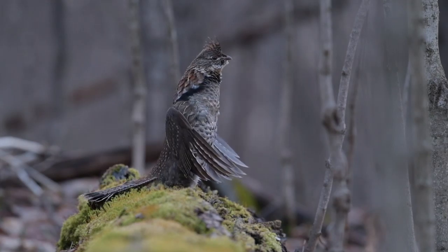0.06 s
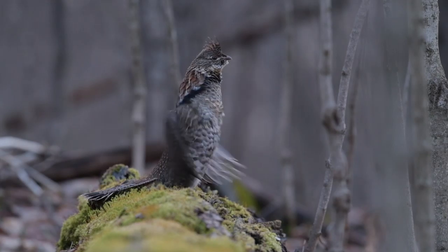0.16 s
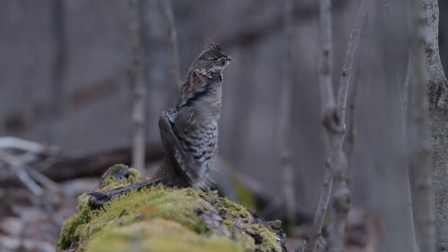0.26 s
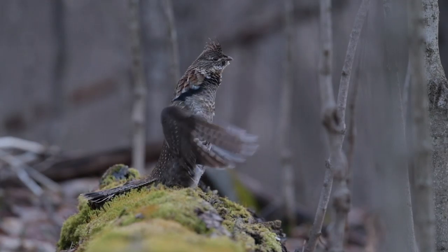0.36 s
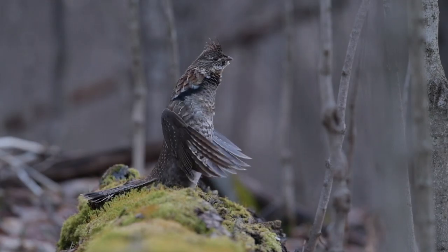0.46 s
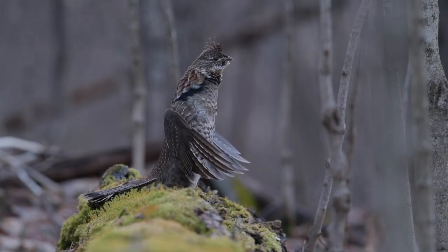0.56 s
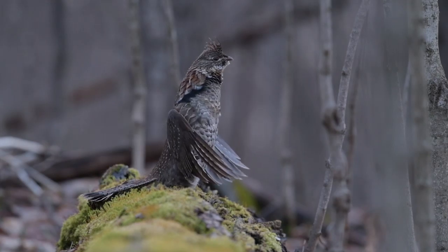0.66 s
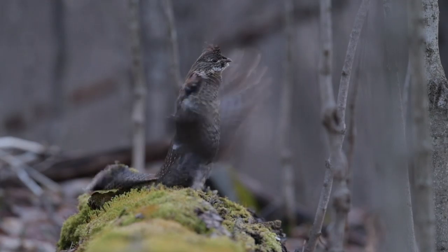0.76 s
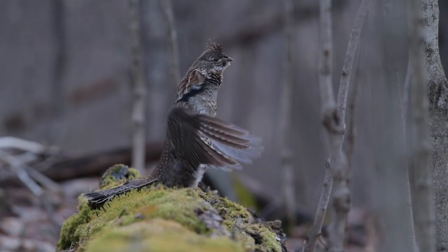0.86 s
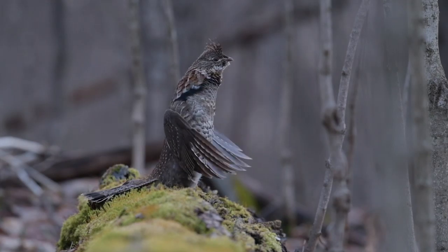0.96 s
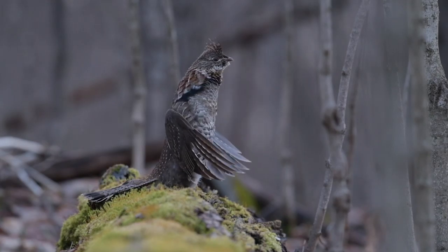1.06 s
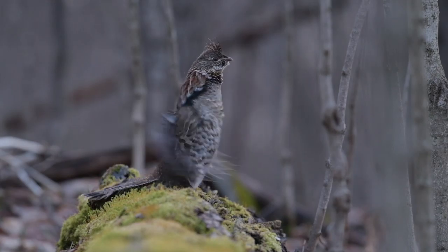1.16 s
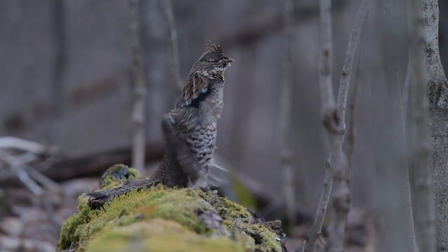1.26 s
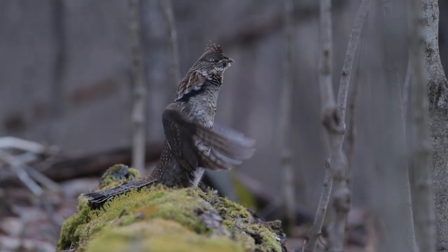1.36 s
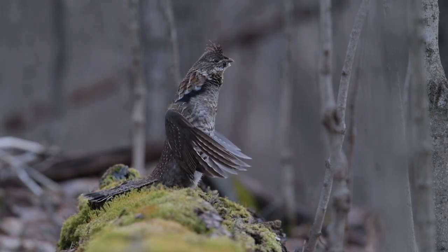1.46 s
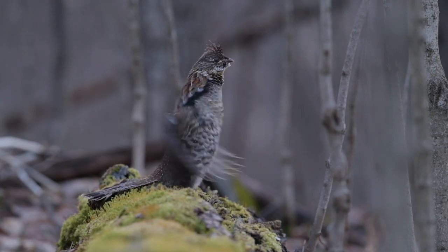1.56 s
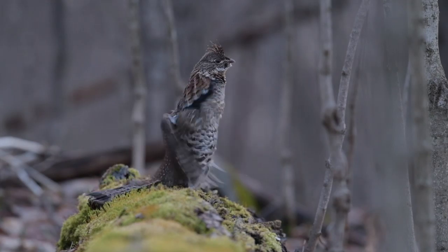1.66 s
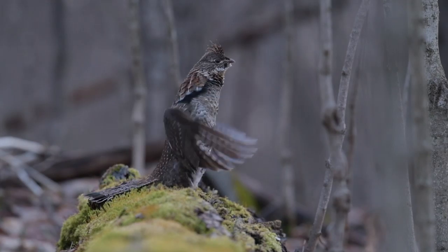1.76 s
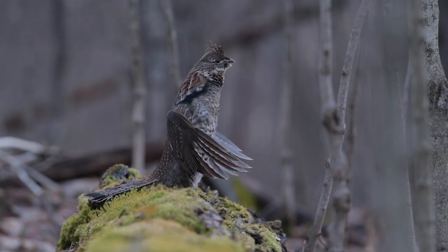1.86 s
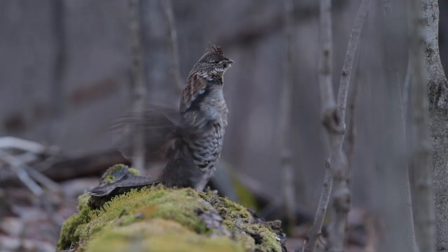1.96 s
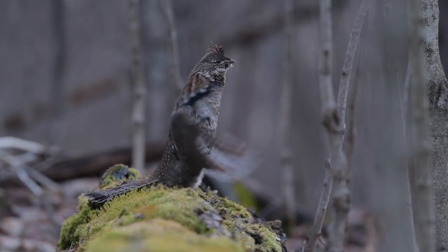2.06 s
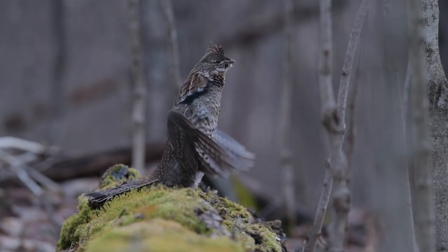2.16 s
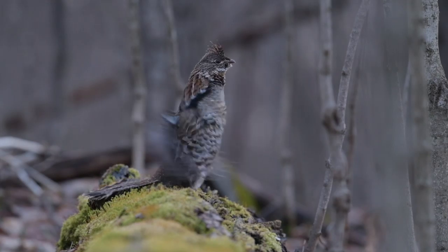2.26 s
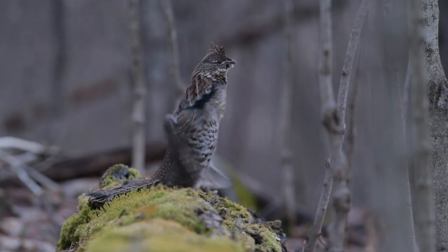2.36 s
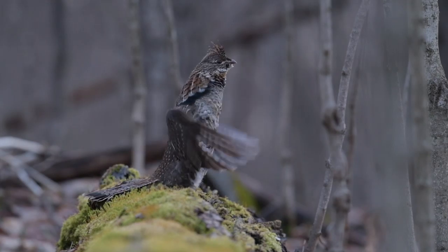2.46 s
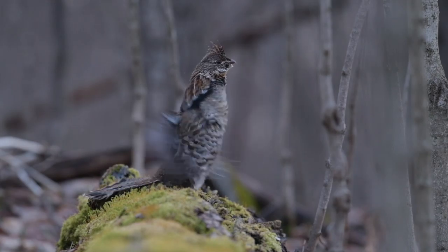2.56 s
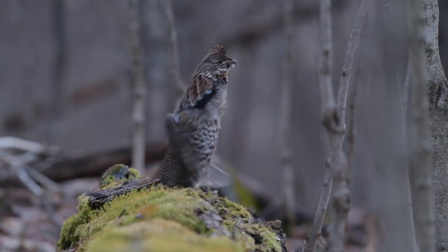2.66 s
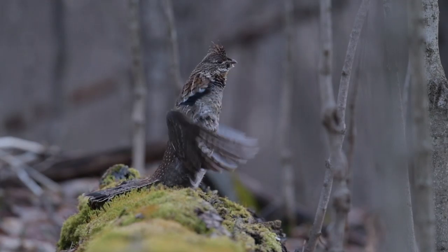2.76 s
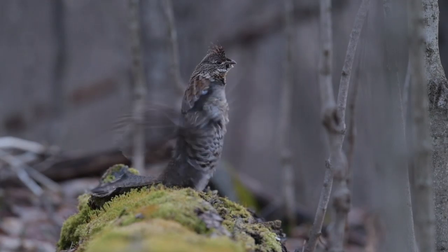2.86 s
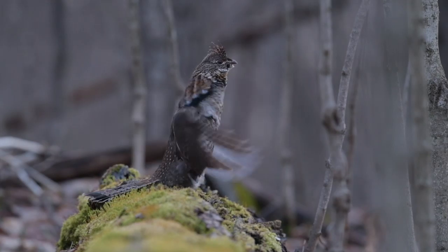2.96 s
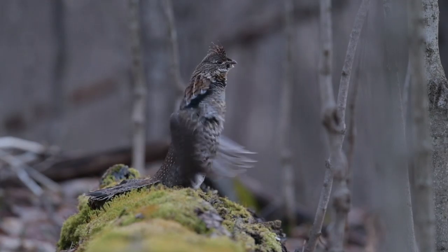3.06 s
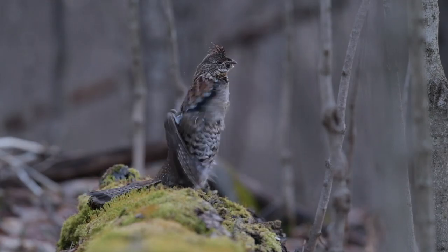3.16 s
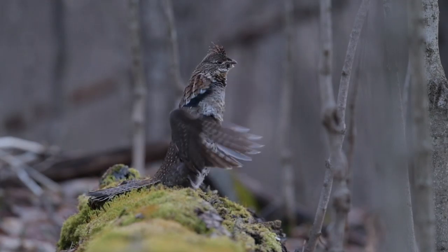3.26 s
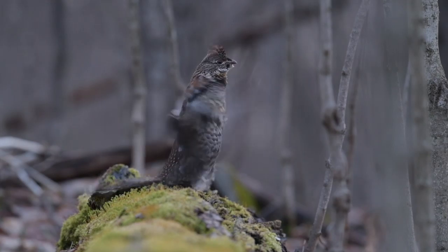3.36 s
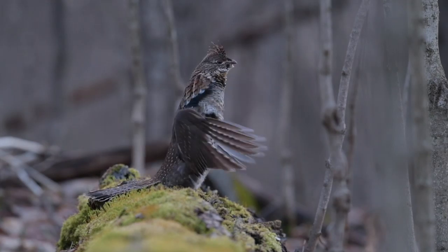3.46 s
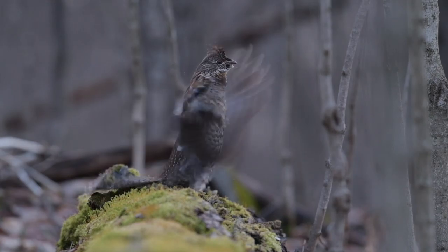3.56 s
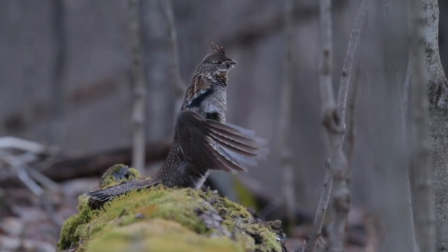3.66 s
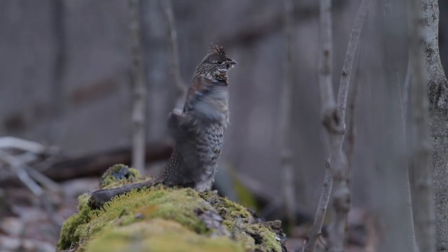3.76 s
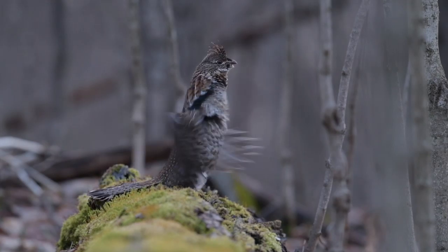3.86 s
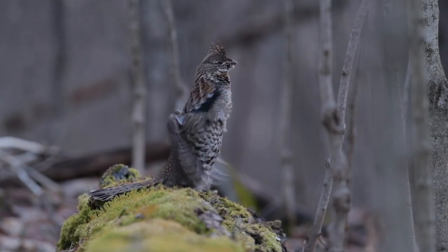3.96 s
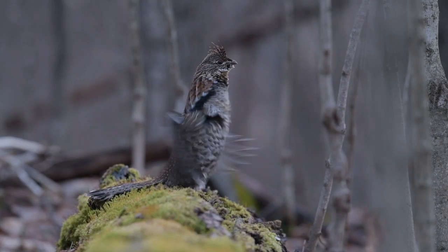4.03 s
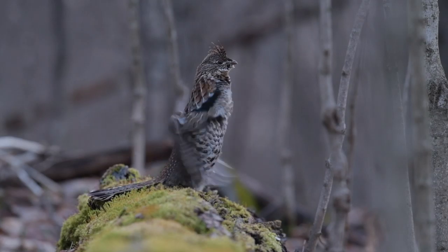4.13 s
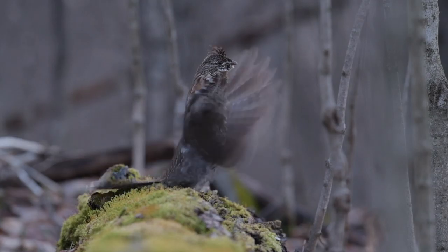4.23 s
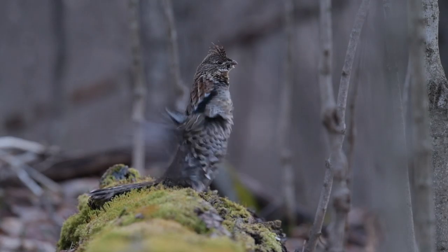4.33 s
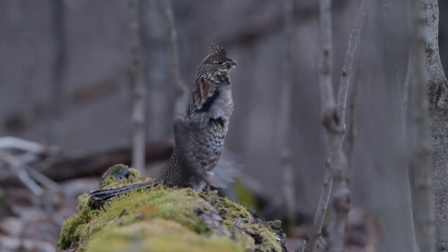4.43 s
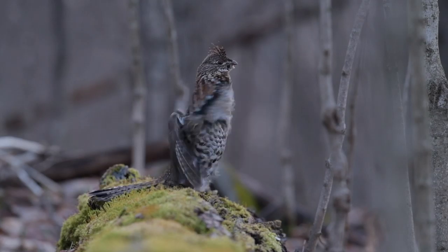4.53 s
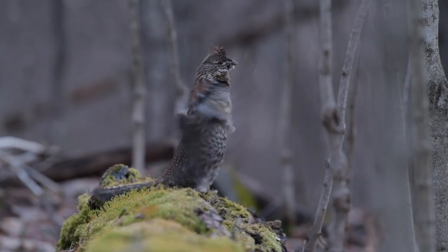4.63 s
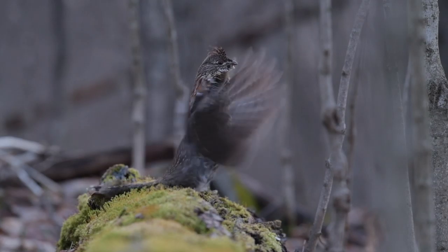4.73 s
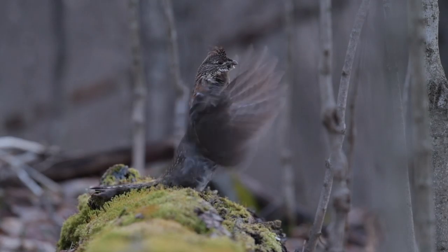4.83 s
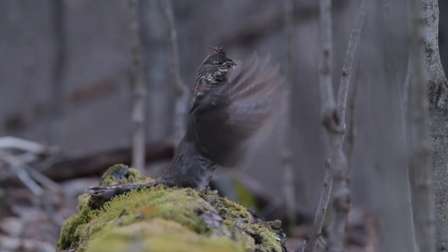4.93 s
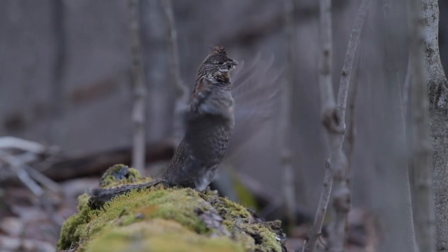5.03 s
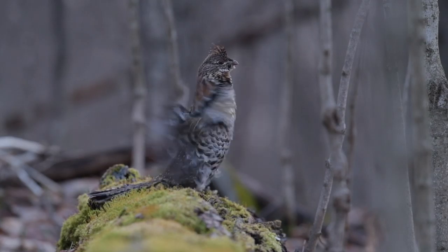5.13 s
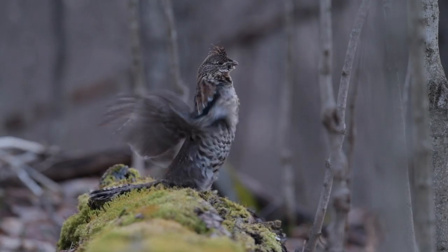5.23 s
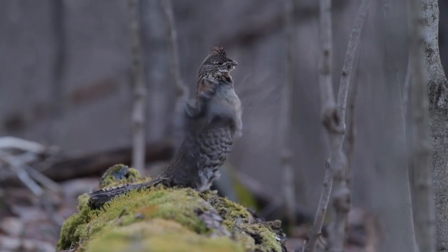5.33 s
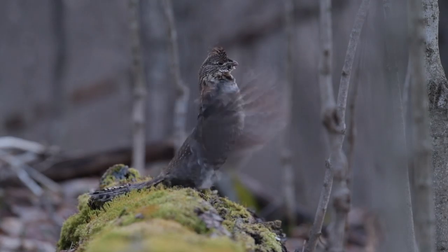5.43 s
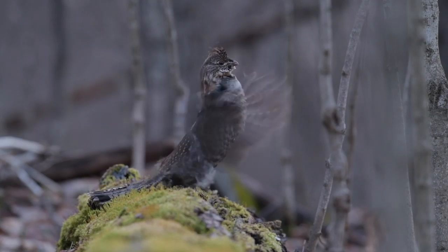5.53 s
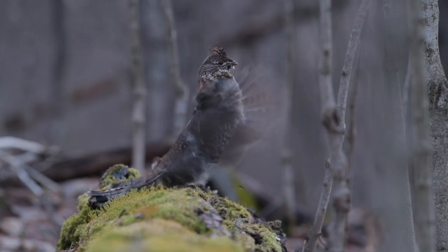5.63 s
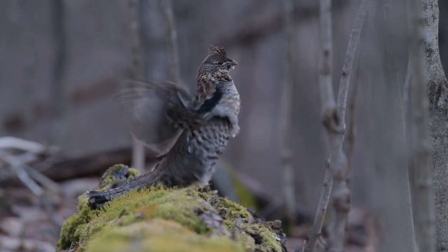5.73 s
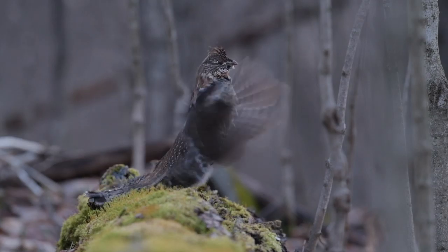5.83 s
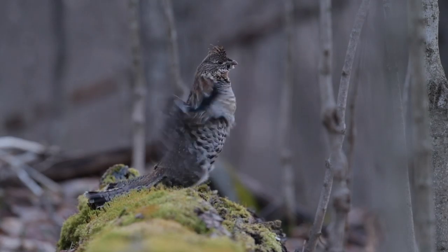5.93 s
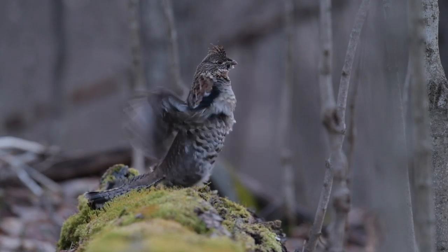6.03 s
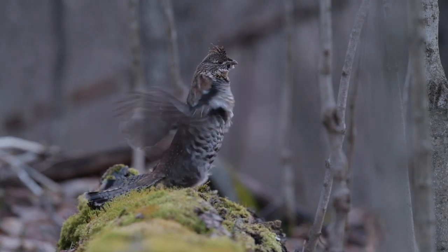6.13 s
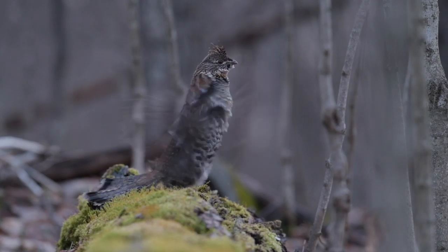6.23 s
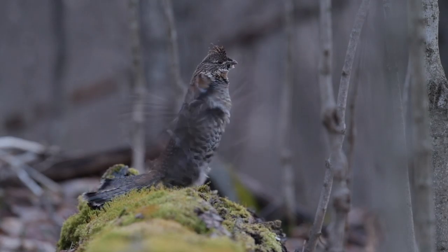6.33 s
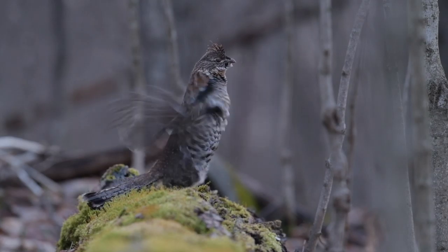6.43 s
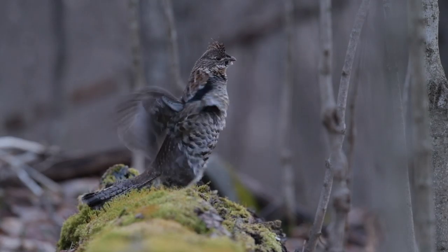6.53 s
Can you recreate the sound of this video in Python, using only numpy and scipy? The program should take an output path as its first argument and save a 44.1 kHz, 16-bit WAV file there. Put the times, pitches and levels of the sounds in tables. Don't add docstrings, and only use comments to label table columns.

```python
import sys
import numpy as np
from scipy import signal
from scipy.fft import rfft, irfft
from scipy.io import wavfile
from scipy.ndimage import uniform_filter1d

SR = 44100
rng = np.random.default_rng(int(sys.argv[2]) if len(sys.argv) > 2 else 0)


def inscribe(sig):
    pcm = np.round(np.clip(np.atleast_2d(sig).T, -1, 1) * 32767)
    wavfile.write(sys.argv[1], SR, pcm.astype(np.int16))


def elevation(decibels):
    levels = np.asarray(decibels, float)
    return 10 ** (levels / 20)


N = 290619
PUFF_MIDDLE = 1323


def evened(x):
    return x / np.sqrt(np.mean(x ** 2) + 1e-20)


def read(points, hz):
    f, value = np.transpose(points)
    return np.interp(np.log(hz + 1), np.log(f + 1), value)


def add(mix, s, sound):
    part = mix[round(s * SR):][:len(sound)]
    part += sound[:len(part)]


def coloured(x, spectrum):
    hz = np.fft.rfftfreq(len(x), 1 / SR)
    return evened(irfft(rfft(x) * elevation(read(spectrum, hz)), len(x)))


def wander(span_s):
    size = int(span_s * SR)
    drift = uniform_filter1d(rng.standard_normal(N), size)
    return evened(uniform_filter1d(drift, size))


# frequency [Hz], level [dB per Hz].
AIR = [(15, -19), (28, -19), (50, 5.5), (110, 0.5), (170, -9.5), (250, -10), (500, -11), (900, -16),
       (1700, -18.5), (2650, -20), (4000, -21), (12700, -25.5), (15700, -19)]
# frequency [Hz], likeness [0-1].
SAME = [(60, 1), (180, 0.71), (550, 0.57), (1650, 0.49), (4970, 0.53), (15000, 0.012)]
# frequency [Hz], left minus right [dB].
TILT = [(60, -1.5), (380, 0.5), (2380, 0.5), (15000, -1.5)]


def air(level_db=-63.5, patchy_db=.4, swell_db=.3):
    frames, hz = N // 256 + 5, np.fft.rfftfreq(1024, 1 / SR)
    a, b, c, d, patches = rng.standard_normal((frames, 513, 5)).T
    patches = uniform_filter1d(patches, 12, 0)
    patches = evened(uniform_filter1d(patches, 14, 1))
    same = np.clip(read(SAME, hz), -1, 1)[:, None]
    left = a + 1j * b
    right = same * left + np.sqrt(1 - same ** 2) * (c + 1j * d)
    z = np.array([left, right])
    z *= elevation(read(AIR, hz)[:, None] + patchy_db * patches)
    z[1] /= elevation(read(TILT, hz))[:, None]
    hiss = signal.istft(z, nperseg=1024, noverlap=768)[1][:, :N]
    return elevation(level_db + swell_db * wander(0.14)) * evened(hiss)


def roll(start_s, tempo):
    number, per_s = np.transpose(tempo)
    gaps = 1 / np.interp(np.arange(1, number[-1] + 1), number, per_s)
    return start_s + np.r_[0, np.cumsum(gaps)]


def follow(curve, times):
    s, *columns = np.transpose(curve)
    return [np.interp(times, s, column) for column in columns]


def puff(shape, steep, slap=0.34, slap_hz=285, slap_s=0.0029):
    hz, half_s, lead_s = shape
    t = np.arange(-PUFF_MIDDLE, PUFF_MIDDLE) / SR
    turn = 2 * np.pi * hz * (t + lead_s)
    push = -np.exp(-(t / half_s) ** 2) * np.sin(turn + steep * np.sin(turn))
    return push + slap * steep * np.exp(-(t / slap_s) ** 2) * np.cos(2 * np.pi * slap_hz * t)


# pitch [Hz], half length [s], front ahead of the middle [s].
FAR_PUFF = (87.6, .008, .003)
FAR_TEMPO = [(1, 1.886), (3, 2.474), (4, 2.737), (5, 3.061), (6, 3.325), (9, 4.427), (11, 5.343),
             (13, 6.171), (17, 8.244), (21, 10.968), (24, 13.818), (29, 21.599), (31, 17.678), (33, 15.942),
             (35, 13.487), (41, 9.238)]
# time [s], thump level [dB].
FAR_EFFORT = [(.3, -43), (2.6, -43), (3, -41.5), (4.9, -43.5), (5.25, -51.5), (5.54, -43.5), (5.75, -47),
              (6.0, -46.5), (6.42, -49.5), (6.52, -52)]
# delay [s], signed strength.
PATHS = [(.0011, .91), (.0118, .24), (.0261, -.93), (.0465, .29), (.065, .39), (.089, -.2), (.1067, -.14),
         (.122, .25)]


def far_bird(start_s=.2851, scatter_db=-31.0, scatter_t60=1.0):
    thumps, paths = np.zeros(N), np.zeros(SR)
    times = roll(start_s, FAR_TEMPO)
    for s, db in zip(times, *follow(FAR_EFFORT, times)):
        add(thumps, s - PUFF_MIDDLE / SR, elevation(db) * puff(FAR_PUFF, 0.085))
    for delay_s, strength in PATHS:
        paths[round(delay_s * SR)] = strength
    t = np.arange(len(paths)) / SR
    hits = rng.random(len(t)) < 150 / SR
    trunks = rng.standard_normal(len(t)) * hits * (t > .13)
    echoes = paths + elevation(scatter_db - 60 * t / scatter_t60) * trunks
    return signal.oaconvolve(thumps, echoes)[:N]


def crackling(crackle_db=3.0, per_s=3000):
    clicks = elevation(crackle_db * np.minimum(rng.exponential(1, N), 4)) * (rng.random(N) < per_s / SR)
    return clicks * rng.choice([-1, 1], N)


def rustle_power(t, trail_db):
    swell_db = 600 * np.maximum(-t - 0.011, 0)
    cut_db = 1200 * np.maximum(t - 0.012, 0)
    held_db = -7.5 - swell_db - cut_db
    trailed_db = np.maximum(held_db, trail_db - 184 * t)
    return elevation(np.where(t > 0, trailed_db, held_db)) ** 2


def by_stroke(strokes, power):
    return np.sqrt(abs(signal.oaconvolve(strokes, power, "same")))


# frequency [Hz], level [dB per Hz].
SWISH = [(290, -1), (500, -4), (1060, -9.5), (2030, -8), (2630, -8.5), (5600, -12.5), (7870, -17),
         (12000, -14.5), (15800, -17)]
# low edge [Hz], high edge [Hz], start from the thump [s], decay [s], level [dB].
SNAP = [
    (3630, 11700, -0.0104, 0.0031, 2),
    (1550, 3550, -0.006, 0.0024, 2.5),
    (440, 1560, -0.0032, 0.0033, 0),
]


def swish(strokes, crackle, t, smooth=0.78, snap_rise_s=0.0011):
    feathers = coloured(evened(crackle) + smooth * rng.standard_normal(N), SWISH)
    sound = feathers * by_stroke(strokes, rustle_power(t, -8)) * elevation(1.2 * wander(.003))
    for low_hz, high_hz, s, decay_s, db in SNAP:
        sos = signal.butter(2, [low_hz, high_hz], "band", fs=SR, output="sos")
        band = signal.sosfilt(sos, feathers[::-1])
        snap = np.exp(-abs(t - s) / np.where(t < s, snap_rise_s, decay_s))
        sound += elevation(db) * band * by_stroke(strokes, snap)
    return sound


# frequency [Hz], level [dB per Hz].
FLUTTER = [(200, 2), (420, -3), (900, -11), (2200, -8.5), (4500, -14.5), (8000, -19), (12000, -15),
           (15800, -23)]


def flutter(strokes, crackle, t, times, level_db=-59.5, lead_s=0.0094):
    per_s = np.interp(np.arange(N) / SR, times[1:], 1 / np.diff(times))
    loose = coloured(evened(crackle[::-1]) + 0.82 * rng.standard_normal(N), FLUTTER)
    loose *= elevation(level_db + 2 * wander(0.0066)) * (per_s / 20) ** 1.79
    return loose * by_stroke(strokes, rustle_power(t + lead_s, -7.5)) / elevation(-68)


# pitch [Hz], half length [s], front ahead of the middle [s].
NEAR_PUFF = (78.5, .0085, .0026)
NEAR_TEMPO = [(1, 2.144), (6, 3.892), (10, 5.415), (16, 8.045), (17, 8.68), (24, 12.693), (25, 14.023),
              (27, 15.831), (31, 22.012), (32, 20.0), (33, 15.75), (36, 14.85), (38, 13.0), (43, 9.628),
              (44, 10.534), (46, 9.558)]
# time [s], thump level [dB], steepness of the front [0-1], swish level [dB].
NEAR_EFFORT = [(.35, -35.5, .19, -54), (.8, -33.5, 0.13, -53), (2.8, -32.5, .42, -52.5),
               (4.1, -33, .43, -53), (4.6, -35.4, 0.25, -55), (5.25, -37, 0.27, -58.5),
               (5.35, -44, 0.5, -60), (5.42, -40.5, 0.3, -56.5), (5.8, -38.5, 0.3, -57.5),
               (6.11, -41.5, 0.17, -58), (6.3, -43.5, 0.2, -68), (6.52, -44.5, 0.17, -82)]


def near_bird(start_s=.3534):
    thumps, strokes = np.zeros(N), np.zeros(N)
    times = roll(start_s, NEAR_TEMPO)
    for s, db, steep, swish_db in zip(times, *follow(NEAR_EFFORT, times)):
        add(thumps, s - PUFF_MIDDLE / SR, elevation(db) * puff(NEAR_PUFF, steep))
        strokes[round(s * SR)] = elevation(swish_db) ** 2
    t = np.arange(-4410, 4411) / SR
    crackle = crackling()
    return thumps + swish(strokes, crackle, t) + flutter(strokes, crackle, t, times)


def resonate(x, hz, width):
    turn = np.exp(2j * np.pi * np.cumsum(hz) / SR)
    r = np.exp(-np.pi * width / SR)
    return 2 * (turn * signal.lfilter([1 - r], [1, -r], x / turn)).real


# frequency [Hz], width [Hz], level [dB].
DRONE = [(519, 82, -9), (686, 103, -3.5), (968, 42, -6), (1340, 160, -9.5), (645, 530, -5)]
# time [s], level [dB].
DRONE_SWELL = [(0, -95), (.3, -81), (.5, -75), (.9, -69.5), (1.6, -68.5), (2.2, -71), (2.6, -72.5),
               (2.85, -77), (3.2, -77)]


def drone(unlike=0.62):
    noise = rng.standard_normal((2, N))
    noise[1] = noise[0] + unlike * noise[1]
    pitch = 1 + 0.003 * wander(0.37)
    bands = np.zeros((2, N))
    for hz, width, db in DRONE:
        once = resonate(noise, hz * pitch, width)
        bands += elevation(db) * evened(resonate(once, hz * pitch, 2 * width))
    return evened(bands) * elevation(np.interp(np.arange(N) / SR, *np.transpose(DRONE_SWELL)))


# start [s], level [dB], pitch [Hz].
TICKS = [(1.678, -50, 3240), (1.681, -51.5, 3020), (2.634, -47, 2120), (2.646, -54, 6000),
         (4.517, -54, 4500), (4.697, -52, 3500), (4.86, -54, 2000), (4.935, -56, 2000), (4.974, -55, 5000),
         (5.282, -51, 2500), (5.334, -49, 2200), (5.553, -55, 6000)]


def ticks():
    out, t = np.zeros(N), np.arange(200) / SR
    for s, db, hz in TICKS:
        add(out, s, elevation(db - 60 * t / 0.0028) * np.sin(2 * np.pi * hz * t))
    return out


# start [s], length [s], first pitch
# [Hz], last pitch [Hz], level [dB].
WHISTLES = [(2.8, .07, 3530, 3500, -82), (2.88, .05, 3490, 3470, -84), (2.96, .09, 3455, 3435, -83),
            (2.93, .075, 2715, 2700, -82), (5.3, .25, 2610, 2600, -83), (5.63, .41, 3570, 3430, -79.5),
            (5.8, .17, 2710, 2690, -82), (5.9, .3, 4190, 4160, -87), (2.3, .22, 495, 485, -78)]


def songbird():
    out, waver_hz = np.zeros(N), 24 * wander(.01)
    for s, length, first_hz, last_hz, db in WHISTLES:
        hz = np.linspace(first_hz, last_hz, round(length * SR))
        hz = hz + waver_hz[round(s * SR):][:len(hz)]
        tone = np.sin(2 * np.pi * np.cumsum(hz) / SR)
        add(out, s, elevation(db + 8.0) * tone * signal.windows.tukey(len(hz), .4))
    return out * elevation(2.6 * wander(.005) - 1.5)


def scene():
    to_the_right = elevation(np.array([[-1.5], [1.5]]))
    return air() + far_bird() + near_bird() + drone() + ticks() + songbird() * to_the_right


def top_cut(x):
    return signal.sosfilt(signal.butter(12, 15870, fs=SR, output="sos"), x)


def record(dry):
    return top_cut(dry)


dry = scene()
out = record(dry)
inscribe(out)
```